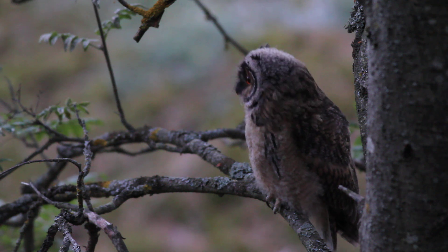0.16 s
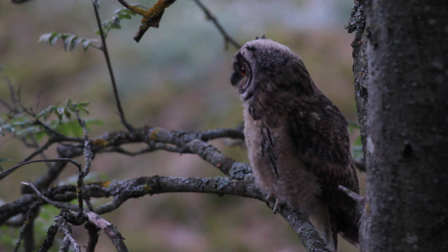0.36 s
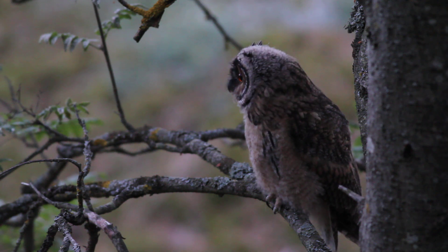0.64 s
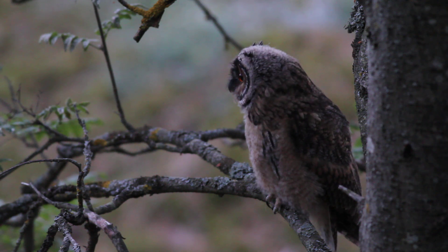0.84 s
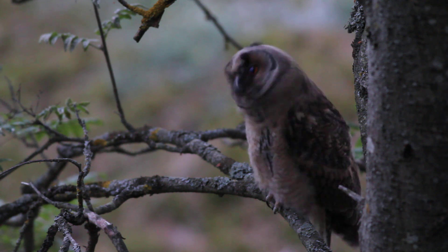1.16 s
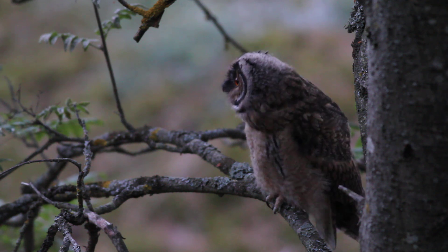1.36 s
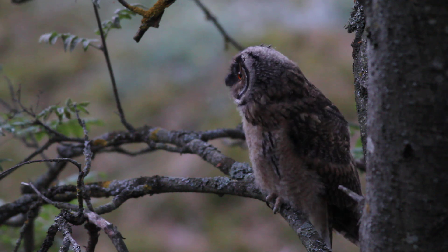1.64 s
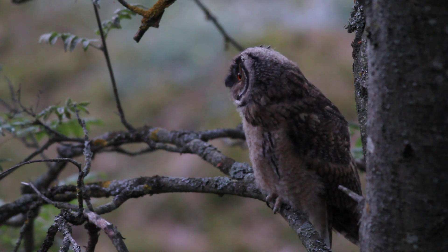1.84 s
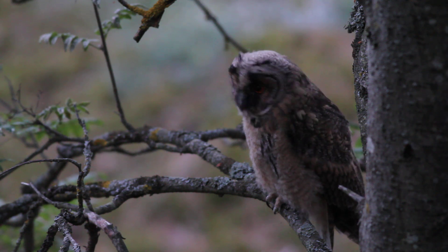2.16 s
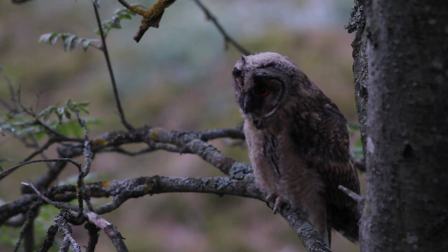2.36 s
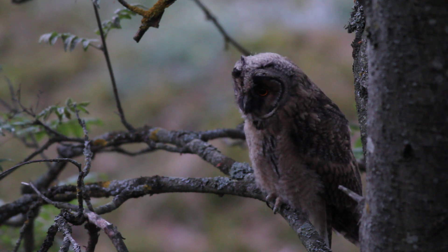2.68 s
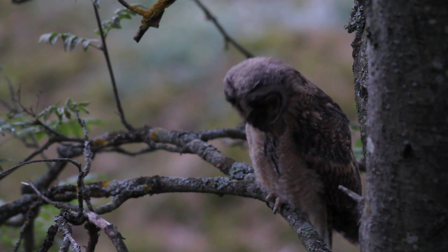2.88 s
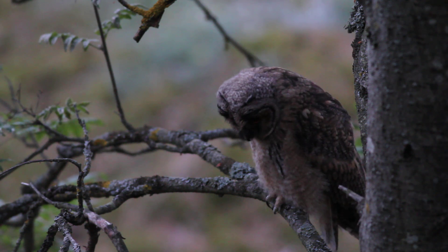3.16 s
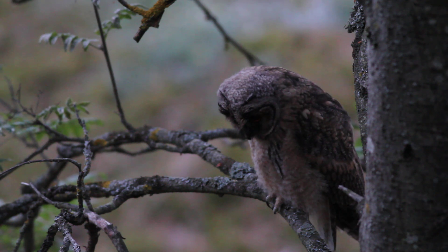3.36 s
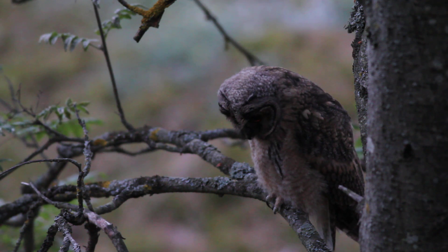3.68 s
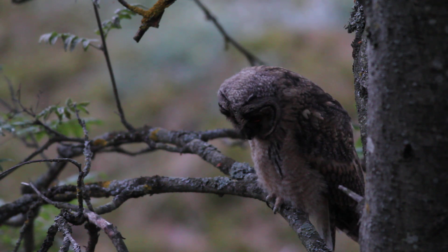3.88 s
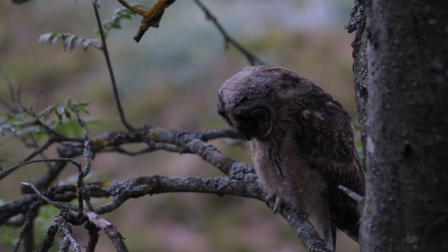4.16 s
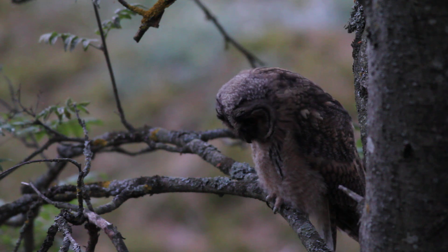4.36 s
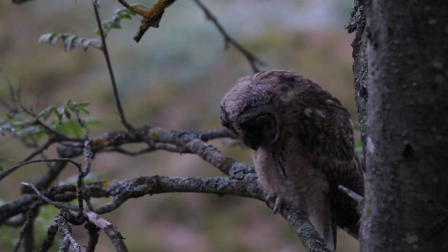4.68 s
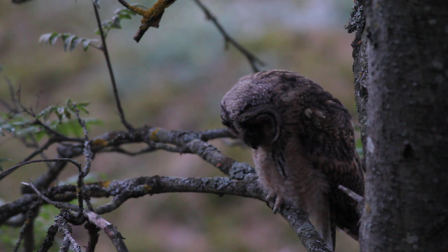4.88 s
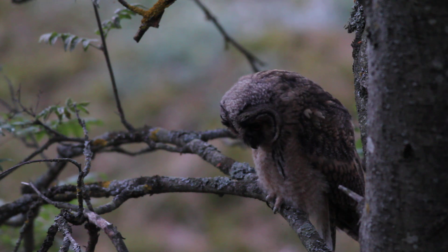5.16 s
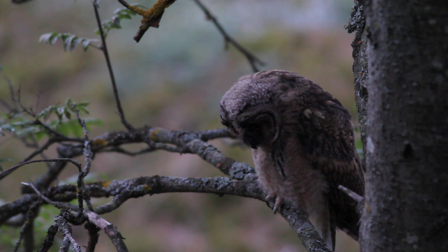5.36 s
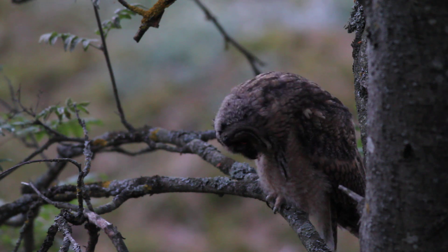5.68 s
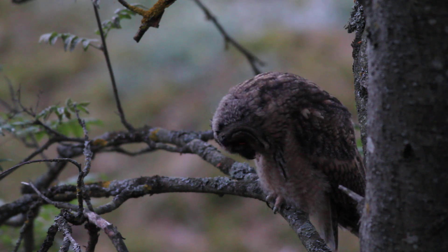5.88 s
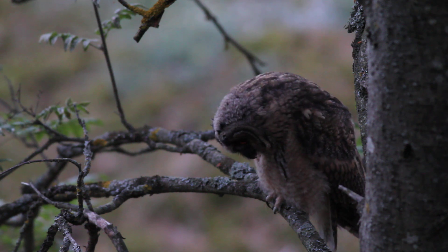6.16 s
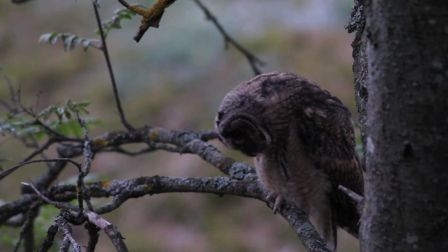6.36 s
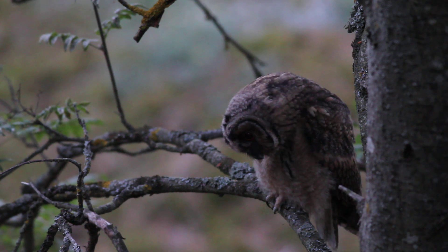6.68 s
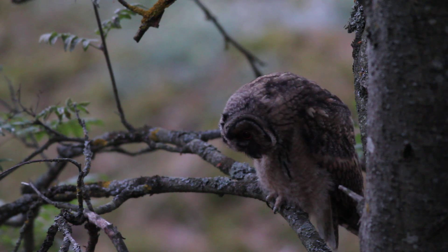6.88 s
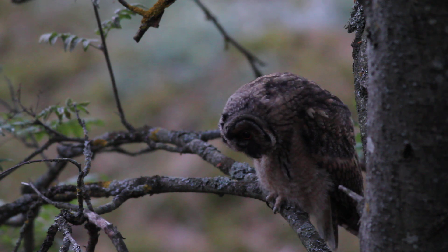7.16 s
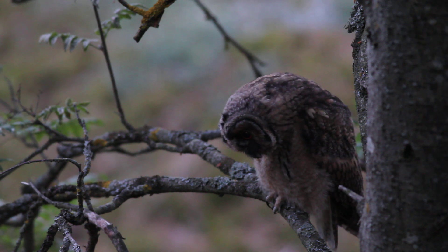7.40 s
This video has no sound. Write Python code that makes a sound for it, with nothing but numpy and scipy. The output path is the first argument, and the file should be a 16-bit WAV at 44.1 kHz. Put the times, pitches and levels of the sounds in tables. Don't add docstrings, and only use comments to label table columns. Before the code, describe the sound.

Quiet open woodland at dusk, one microphone among trunks. Sparse sharp bird ticks and very faint far whistles come first, then twigs snap in a brief leaf rustle. A close owl chick gives one high, falling squeal that breaks into rasp. Distant thrush clucks follow, then another run of ticks, and three farther chicks squeal in overlap. A faint hum and soft wind bumps remain, with two last ticks.

```python
import sys
import numpy as np
from scipy import signal
from scipy.fft import rfft, irfft, next_fast_len
from scipy.io import wavfile
from scipy.ndimage import uniform_filter1d, map_coordinates

SR = 44100
rng = np.random.default_rng(int(sys.argv[2]) if len(sys.argv) > 2 else 0)


def voltage_ratio(decibels):
    exponent = np.asarray(decibels, float) / 20
    return 10 ** exponent


def generate_wav(sig):
    pcm = np.round(np.clip(np.atleast_2d(sig).T, -1, 1) * 32767).astype(np.int16)
    wavfile.write(sys.argv[1], SR, pcm)


N = 332073

# (frequency [Hz], time to fall 60 dB [s])
DEEP_WOOD = [(1500, 1.4), (5000, 1.08), (9000, 0.62), (14000, 0.71)]


def unit(x):
    return x / np.sqrt(np.mean(x ** 2) + 1e-20)


def along(points, hz):
    f, v = np.transpose(points)
    return np.interp(np.log(hz + 1), np.log(f + 1), v)


def wobble(rate, size):
    knots = rng.standard_normal(int(size * rate / SR) + 4)
    return map_coordinates(knots, [np.arange(size) * rate / SR])


def add(track, s, sound):
    part = track[round(s * SR):][:len(sound)]
    part += sound[:len(part)]


def coloured(x, gain):
    m = next_fast_len(len(x) + 4096)
    spectrum = rfft(x, m) * gain(np.fft.rfftfreq(m, 1 / SR))
    return irfft(spectrum, m)[..., :x.shape[-1]]


def rush(spectrum, patchy_db):
    hz, _, z = signal.stft(rng.standard_normal(N), SR, nperseg=2048)
    field = uniform_filter1d(rng.standard_normal(z.shape), 24, 0)
    field = unit(uniform_filter1d(field, 4, 1))
    gain = voltage_ratio(along(spectrum, hz)[:, None] + patchy_db * field)
    return unit(signal.istft(z * gain, nperseg=2048)[1][:N])


def echoes(x, decay, gap_s):
    hz, t, z = signal.stft(rng.standard_normal(SR), SR, nperseg=256)
    fall = voltage_ratio(-60 * t / along(decay, hz)[:, None])
    tail = signal.istft(z * fall, SR, nperseg=256)[1]
    tail = np.pad(tail / np.linalg.norm(tail), (round(gap_s * SR), 0))
    return signal.fftconvolve(x, tail)[:N]


def woodland(x, near_db, deep_db):
    # (frequency [Hz], time to fall 60 dB [s])
    near_trunks = [(1500, 0.26), (5000, 0.33), (9000, 0.17), (14000, 0.24)]
    # (frequency [Hz], gain [dB])
    scatter = [(2000, -3), (5000, 1.5), (10000, 4), (15000, 20)]
    near = coloured(echoes(x, near_trunks, .004), lambda f: voltage_ratio(along(scatter, f)))
    deep = echoes(x, DEEP_WOOD, .03)
    return x + voltage_ratio(near_db) * near + voltage_ratio(deep_db) * deep


def distant_hum():
    # (frequency [Hz], density [dB per Hz])
    hum_spectrum = [(15, -41), (25, -12), (55, -8.5), (107, -8), (255, -2), (474, 0), (770, -4.5),
                    (882, -5), (1320, -8.5), (1730, -10), (2040, -11.5), (4340, -16), (7440, -19.5),
                    (11200, -19.5), (15800, -27)]
    swell_db = .25 * wobble(2, N)
    return voltage_ratio(-53 + swell_db) * rush(hum_spectrum, patchy_db=.5)


def far_crickets():
    # (frequency [Hz], density [dB per Hz])
    chorus = [(11000, -40), (12000, -8), (12400, -2), (12800, -8), (13800, -40)]
    return voltage_ratio(-75 + 1.5 * wobble(5, N)) * rush(chorus, patchy_db=4.0)


def breeze():
    # (time [s], level [dB])
    strength = [(0, -65.5), (1.1, -65.5), (1.3, -54.5), (1.78, -56), (2.5, -70), (3, -64), (3.5, -65.5),
                (4, -59), (4.5, -64), (5.5, -76), (6.5, -88), (7.53, -73)]
    # (frequency [Hz], density [dB per Hz])
    leaf_spectrum = [(300, -31), (900, -1.5), (1600, 0.5), (2500, 0.5), (3600, -4), (6000, -5),
                     (10000, -9.5), (15000, -18)]
    # (frequency [Hz], density [dB per Hz])
    treetop_spectrum = [(5000, -25), (8000, -9), (12000, 12), (14000, 3.5), (16000, -4)]
    s, rustle_db = np.transpose(strength)
    fizz_db = -67 + 0.68 * (rustle_db + 64.5)
    t = np.arange(N) / SR
    leaf_gain = voltage_ratio(np.interp(t, s, rustle_db) + 1.1 * wobble(14, N))
    treetop_gain = voltage_ratio(np.interp(t, s, fizz_db) + 0.81 * wobble(9, N))
    rustle = leaf_gain * rush(leaf_spectrum, patchy_db=.8)
    return rustle + treetop_gain * rush(treetop_spectrum, patchy_db=2.5)


def puffs():
    # (middle [s], peak level [dB], frequency [Hz])
    gusts = [(.89, -55, 54), (1.68, -56, 62), (2.32, -51, 40), (2.36, -51, 44.3), (2.429, -40.5, 72),
             (2.589, -43, 85), (2.633, -48, 65), (2.675, -53, 65), (3.925, -59, 60), (4.105, -50, 64.6),
             (4.198, -48, 124), (4.52, -50, 50), (4.625, -55, 60), (4.988, -51, 69.6), (6.05, -54, 50),
             (6.36, -56, 42), (6.97, -49, 55.6)]
    track = np.zeros(N)
    for s, db, hz in gusts:
        cycles = np.arange(-1.3, 1.3, hz / SR)
        swing = np.sin(2 * np.pi * cycles + rng.uniform(0, 2 * np.pi))
        push = np.exp(-(cycles / 0.53) ** 2) * swing
        add(track, s - 1.46 / hz, voltage_ratio(db) * push)
    return track


def twigs():
    # (time [s], peak level [dB], resonance [Hz], width [Hz])
    snaps = [(1.294, -48, 1200, 1500), (1.379, -40, 2200, 1500), (1.662, -34, 1360, 350),
             (1.736, -37.5, 1800, 2500), (1.75, -43.5, 1200, 400), (3.05, -52, 12500, 3000),
             (4.72, -38, 1200, 1200), (5.77, -48, 11450, 2995), (6.028, -44, 12800, 2960),
             (6.68, -55, 13500, 2000)]
    track, t = np.zeros(N), np.arange(SR // 40) / SR
    for s, db, hz, width_hz in snaps:
        ring = np.exp(-np.pi * width_hz * t) * np.sin(2 * np.pi * hz * t)
        burst = voltage_ratio(-60 * t / .015) * rng.standard_normal(len(t))
        snap = np.convolve(burst, ring)
        add(track, s - .001, voltage_ratio(db) * snap / np.abs(snap).max())
    return woodland(track, near_db=-23, deep_db=-15)


def thrush():
    # (time [s], length [s], start [Hz], end [Hz], level [dB])
    whistles = [(.52, 0.035, 1725, 1900, -63), (0.662, .04, 2140, 2120, -68),
                (0.71, 0.041, 2370, 2330, -60.5), (.785, 0.027, 2240, 2200, -62),
                (.82, 0.093, 2220, 2080, -67), (2.858, .02, 2210, 2420, -60), (3.26, .02, 2250, 2480, -60),
                (3.321, .045, 2410, 2050, -63)]
    # (delay [s], length [s], start [Hz], end [Hz], level [dB])
    cluck = [
        (0, .034, 2443, 1198, 0),
        (.1315, .0235, 2410, 1975, 0.3),
        (0.186, .044, 2480, 1270, -1.2),
    ]
    # (time [s], level [dB])
    phrases = [
        (2.669, -58.5),
        (3.113, -56),
    ]
    track = np.zeros(N)
    clucks = [(s + delay, *note, db + lift) for s, db in phrases for delay, *note, lift in cluck]
    for s, length, start_hz, end_hz, db in whistles + clucks:
        u = np.linspace(0, 1, round(length * SR))
        glide = start_hz * (end_hz / start_hz) ** (u ** .8)
        glide = glide * (1 + 0.0083 * wobble(155, len(u)))
        flutter = unit(voltage_ratio(1.8 * wobble(120, len(u))))
        swell = voltage_ratio(db + 5) * flutter * np.sin(np.pi * u ** .7) ** .6
        add(track, s, swell * np.sin(2 * np.pi * np.cumsum(glide) / SR))
    return woodland(track, near_db=-1.5, deep_db=-6)


def ticker():
    # (time [s], peak level [dB], centre [Hz])
    ticks = [(0.4306, -39, 7130), (0.6128, -38, 7270), (0.6797, -43, 7330), (0.7726, -41, 6900),
             (0.978, -42, 7030), (1.265, -44, 7100), (1.5244, -42.5, 6880), (4.1682, -39, 7300),
             (4.2284, -40, 7000), (4.33, -40, 7080), (4.3999, -36, 6960), (4.4927, -40.5, 6800),
             (4.6066, -37, 6840), (7.4543, -41.5, 7140), (7.511, -43, 6800)]
    track, t, lag = np.zeros(N), np.arange(round(.0055 * SR)) / SR, np.arange(SR // 4) / SR
    u = t / t[-1]
    for s, db, hz in ticks:
        sweep = hz * (1 + 0.26 * (u - .5) + 2.0 * (u - .5) ** 3)
        flutter = unit(voltage_ratio(1.9 * wobble(1270, len(t))))
        swell = voltage_ratio(db - 2) * flutter * np.sin(np.pi * u) ** 1.03
        tick = swell * np.sin(2 * np.pi * np.cumsum(sweep) / SR)
        smear = voltage_ratio(-60 * lag / 0.039) + voltage_ratio(-11.0 - 29 * (lag / .13) ** 2)
        leaves = smear * rng.standard_normal(len(lag))
        add(track, s - .0025, tick)
        add(track, s - .0015, voltage_ratio(3.0) * signal.fftconvolve(tick, leaves / np.linalg.norm(leaves)))
    return track + voltage_ratio(-15.5) * echoes(track, DEEP_WOOD, 0.018)


def chick(rows, beak_db, strain, rasp_hz, near_db, deep_db):
    # (frequency [Hz], gain [dB])
    beak_colour = [(1000, -5), (1270, 8), (2200, -7), (3300, -2.5), (4500, 7), (6000, 6), (9000, 3),
                   (13000, 1), (16000, -9)]
    edge_s = .025
    s, *cols = np.transpose(rows)
    t = np.arange(s[0], s[-1], 1 / SR)
    size = len(t)
    hz, effort_db, gape_db = [uniform_filter1d(np.interp(t, s, c), size=500) for c in cols]
    doubling_db, rasp_db = [
        np.interp(t, [start - edge_s, start, end, end + edge_s], [calm_db, first_db, last_db, calm_db])
        for start, end, first_db, last_db, calm_db in strain]

    phase = 2 * np.pi * np.cumsum(hz * (1 + .0012 * wobble(70.2, size))) / SR
    levels = [effort_db + db + (k > 1) * gape_db for k, db in enumerate(beak_db)]
    partials = [(k * hz < .45 * SR) * np.exp(1j * (k * phase + rng.uniform(0, 2 * np.pi)))
                for k in range(1, len(levels) + 1)]
    tone = np.zeros(size)
    slope = np.zeros(size)
    for k, (db, partial) in enumerate(zip(levels, partials)):
        fading_db = 1.45 * wobble(18, size)
        drain_db = 7.6 * k * voltage_ratio(rasp_db)
        tone += voltage_ratio(db - drain_db + fading_db) * partial.imag
        slope += (k + 1) / 3 * voltage_ratio(np.median(db)) * partial.real

    drift = .4 * wobble(35, size) + 7 * voltage_ratio(rasp_db) * wobble(300, size)
    doubling = voltage_ratio(doubling_db + 3.9 * wobble(34.7, size)) * 2 * np.cos(phase / 2 + drift)
    rasp_gain = voltage_ratio(rasp_db + 3.6 * wobble(240.4, size) + 0.89 * wobble(24, size))
    rasp = rasp_gain * unit(wobble(rasp_hz, size) * np.cos(phase / 4))
    unsteady = coloured(slope * (doubling + rasp), lambda f: voltage_ratio(along(beak_colour, f)))
    edges = np.clip(np.minimum(t - s[0], s[-1] - t) / 0.005, 0, 1)
    track = np.zeros(N)
    add(track, s[0], np.sqrt(2) * edges * (tone + unsteady))
    return woodland(track, near_db, deep_db)


def far_chick():
    # (time [s], pitch [Hz], effort [dB], lift of overtones by the opening beak [dB])
    squeal = [(4.56, 2050, -66, -8), (4.585, 2450, -60, -10), (4.6, 2565, -59, -7),
              (4.63, 2505, -49.5, -10), (4.68, 2515, -49.5, -10), (4.76, 2576, -54, -6),
              (4.85, 2580, -48, -16), (5.03, 2510, -40, -20), (5.065, 2380, -64, -8)]
    beak = [0.5, -15.5, -3, -17, -17, -33, -50, -50]
    # (from [s], to [s], first level [dB], last level [dB], level outside [dB])
    breaks = [
        (4.6, 5.05, -40, -41, -42),
        (4.6, 5.05, -40, -41, -42),
    ]
    return chick(squeal, beak, breaks, rasp_hz=900, near_db=-17, deep_db=-15)


def left_chick():
    # (time [s], pitch [Hz], effort [dB], lift of overtones by the opening beak [dB])
    squeal = [(4.74, 2320, -43.5, -11), (4.755, 2475, -29, -15.5), (4.79, 2555, -32.5, -15.5),
              (4.87, 2561, -26, -21), (4.95, 2546, -35.5, -11), (5.08, 2492, -35, -11),
              (5.17, 2476, -28, -22), (5.235, 2478, -29.5, -22), (5.265, 2220, -51.5, -9)]
    beak = [-10, 0.1, 4, 0.5, -10.5, -35, -50, -50]
    # (from [s], to [s], first level [dB], last level [dB], level outside [dB])
    breaks = [
        (4.97, 5.2, -24, -26.5, -34),
        (4.76, 5.23, -22, -30, -40),
    ]
    return chick(squeal, beak, breaks, rasp_hz=800, near_db=-8.0, deep_db=-12)


def right_chick():
    # (time [s], pitch [Hz], effort [dB], lift of overtones by the opening beak [dB])
    squeal = [(5.045, 2438, -42, -12), (5.065, 2530, -28, -10), (5.085, 2586, -37, -8),
              (5.14, 2603, -36.5, -6), (5.21, 2602, -38, -8), (5.3, 2560, -37.5, -6),
              (5.4, 2493, -38, -6.5), (5.49, 2428, -35, -12), (5.525, 2292, -48.5, 1.5)]
    beak = [-3.5, 0.3, -0.4, -1.1, -22, -44, -50, -50]
    # (from [s], to [s], first level [dB], last level [dB], level outside [dB])
    breaks = [
        (5.13, 5.5, -25, -25.5, -33),
        (5.06, 5.51, -28, -30, -40),
    ]
    return chick(squeal, beak, breaks, rasp_hz=904, near_db=-5.0, deep_db=-13.5)


def near_chick():
    # (time [s], pitch [Hz], effort [dB], lift of overtones by the opening beak [dB])
    squeal = [(1.808, 1990, -44, 1), (1.82, 2180, -30.5, 1), (1.84, 2236, -26.5, -6.5),
              (1.875, 2071, -38, 7.5), (1.95, 2207, -29, -2.5), (2.01, 2187, -26, -6.5),
              (2.16, 2007, -31, -1.5), (2.35, 1903, -40.5, 7), (2.44, 1867, -60.5, 3)]
    beak = [-9, 0.2, -1.5, -1.5, -10, -24, -31.5, -43]
    # (from [s], to [s], first level [dB], last level [dB], level outside [dB])
    breaks = [
        (1.951, 2.14, -21.5, -20.5, -50),
        (2.045, 2.162, -23.5, -12.5, -42),
    ]
    return chick(squeal, beak, breaks, rasp_hz=2603, near_db=-2, deep_db=-19)


def scene():
    background = distant_hum() + far_crickets() + breeze() + puffs() + twigs()
    small_birds = thrush() + ticker()
    owls = far_chick() + left_chick() + right_chick() + near_chick()
    return (background + small_birds + owls)[None]


def low_pass(x):
    return signal.sosfilt(signal.butter(12, 15990, fs=SR, output="sos"), x)


def record(dry):
    mix = coloured(dry[0], lambda f: f < 15830)[None]
    return low_pass(mix)


dry = scene()
out = record(dry)
generate_wav(out)
```